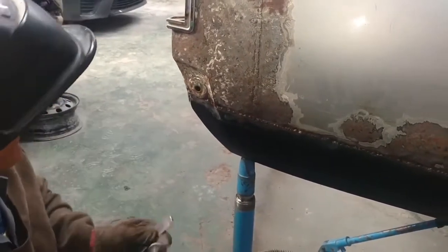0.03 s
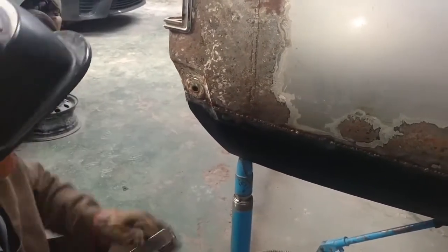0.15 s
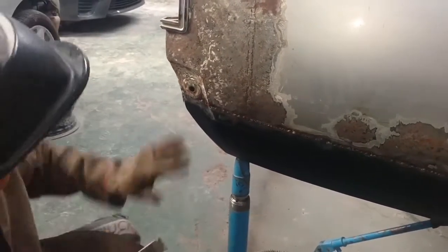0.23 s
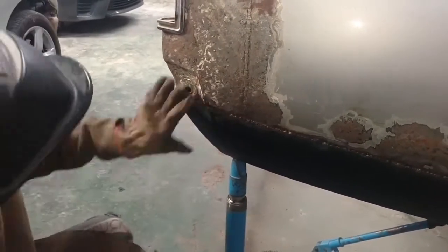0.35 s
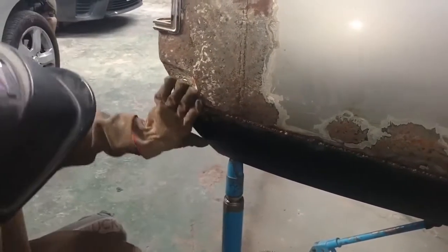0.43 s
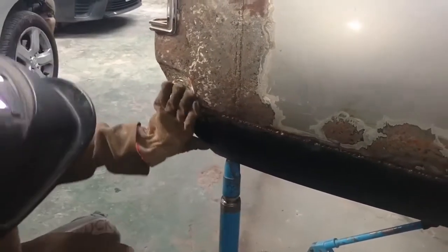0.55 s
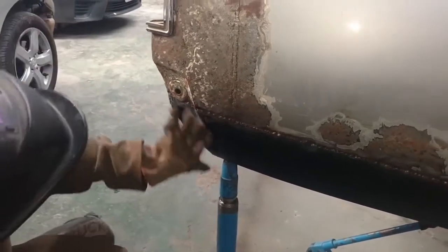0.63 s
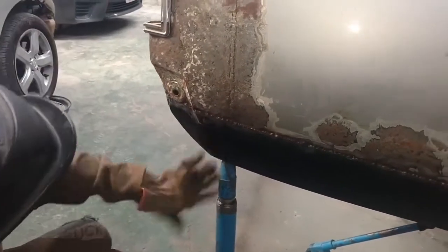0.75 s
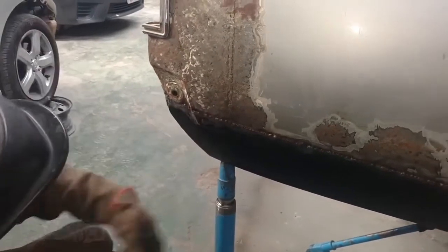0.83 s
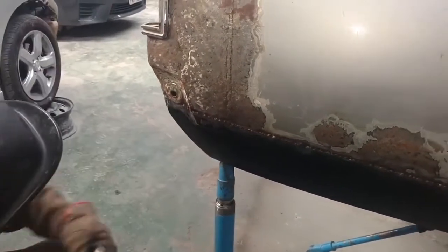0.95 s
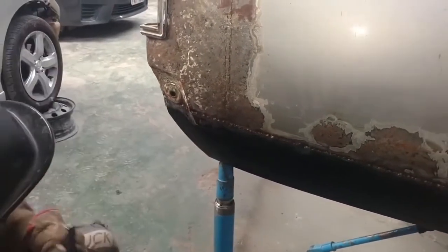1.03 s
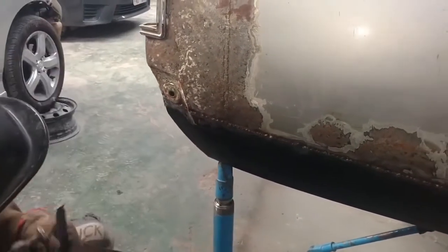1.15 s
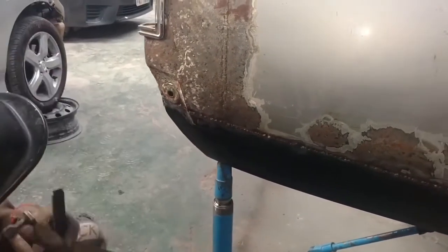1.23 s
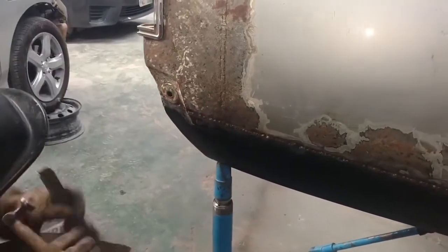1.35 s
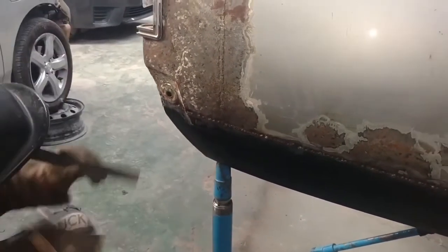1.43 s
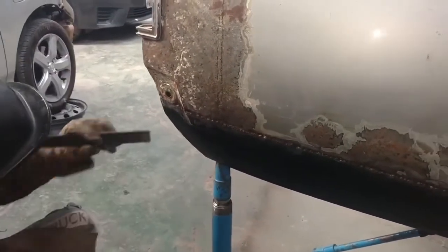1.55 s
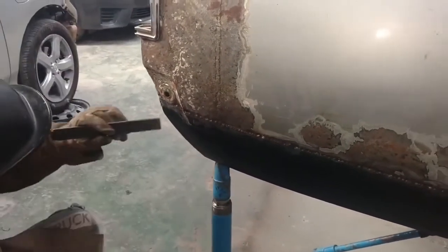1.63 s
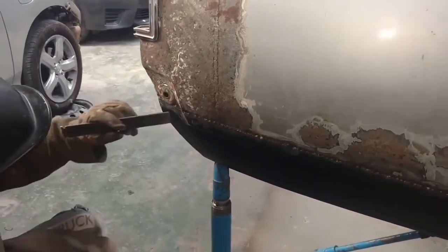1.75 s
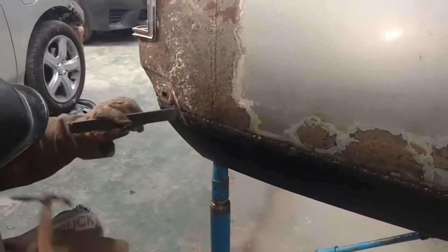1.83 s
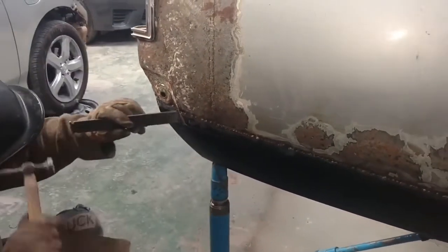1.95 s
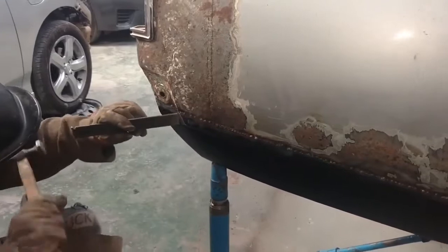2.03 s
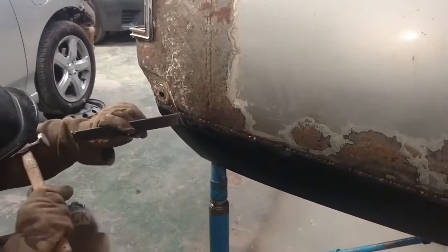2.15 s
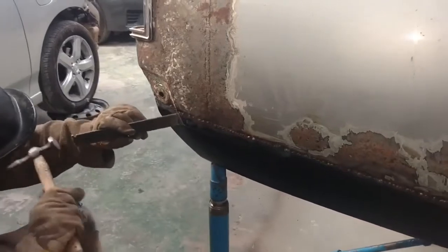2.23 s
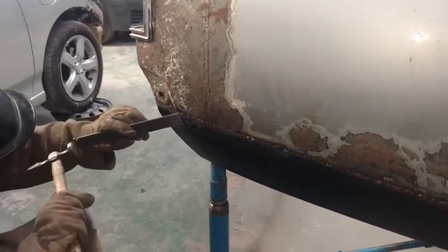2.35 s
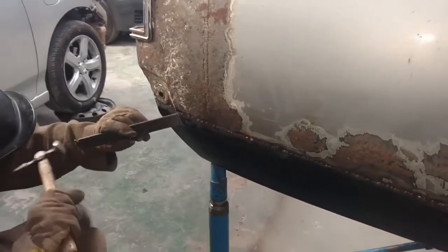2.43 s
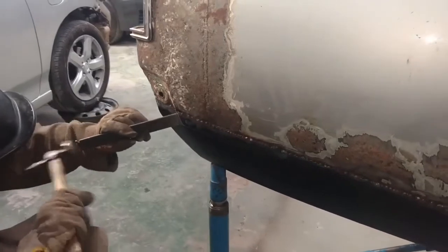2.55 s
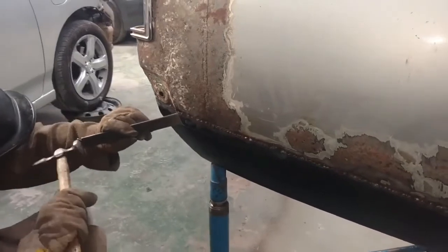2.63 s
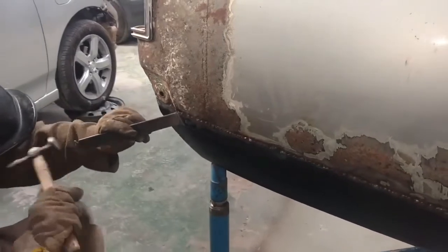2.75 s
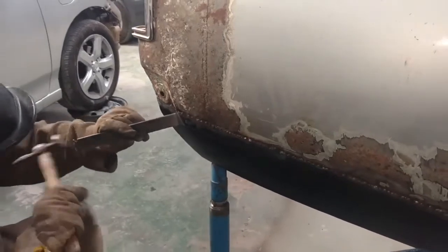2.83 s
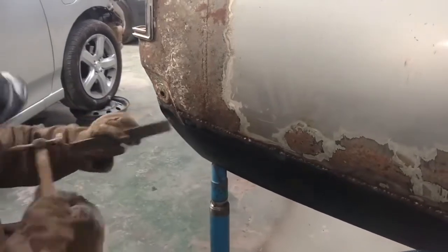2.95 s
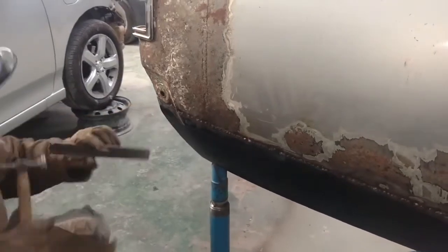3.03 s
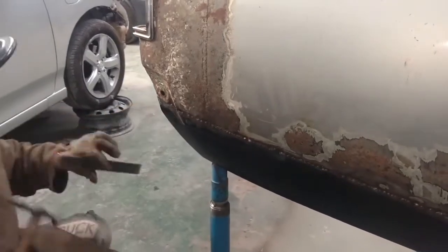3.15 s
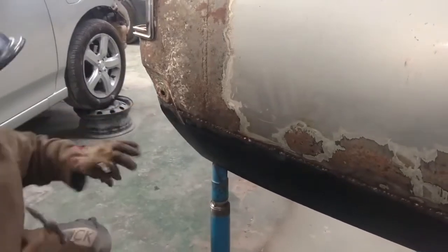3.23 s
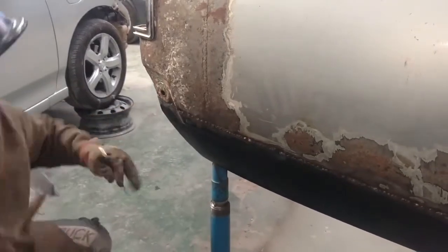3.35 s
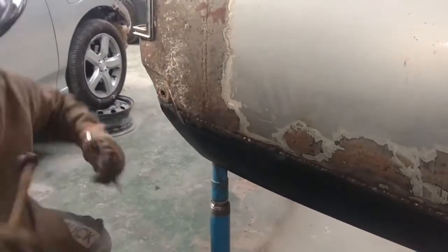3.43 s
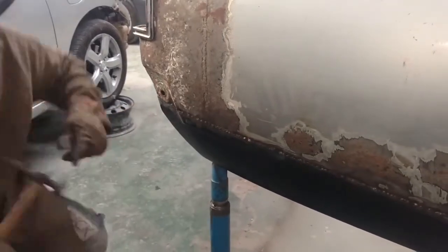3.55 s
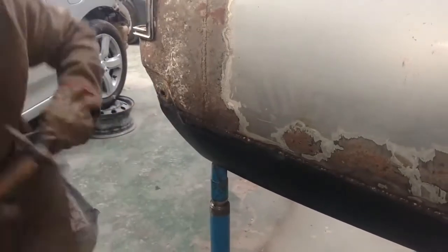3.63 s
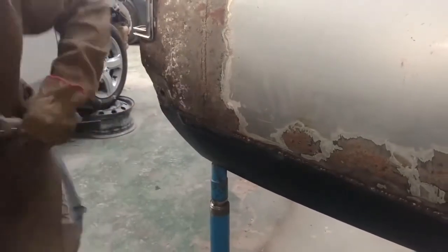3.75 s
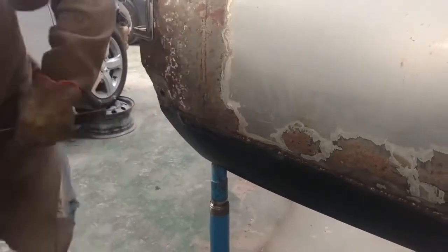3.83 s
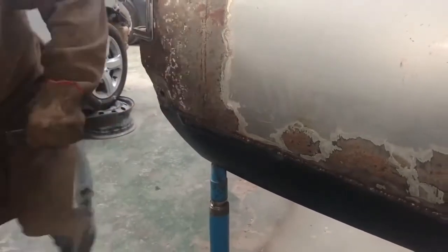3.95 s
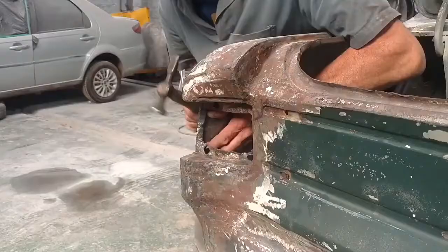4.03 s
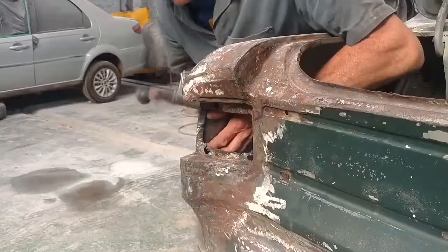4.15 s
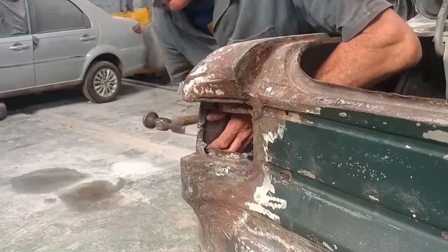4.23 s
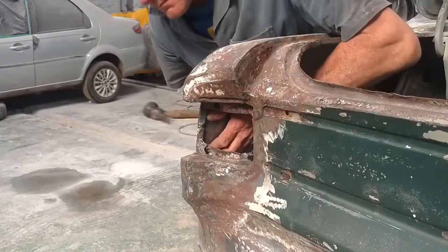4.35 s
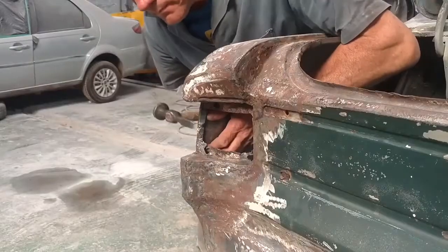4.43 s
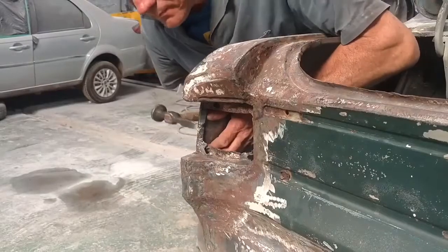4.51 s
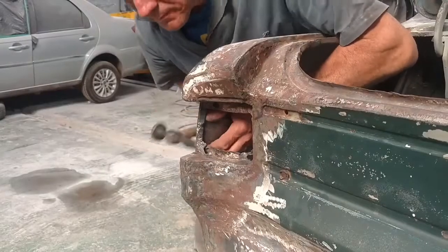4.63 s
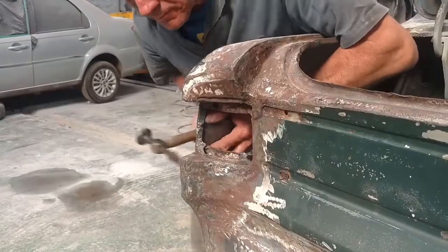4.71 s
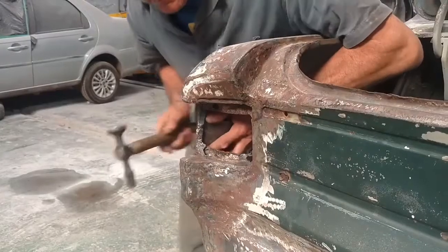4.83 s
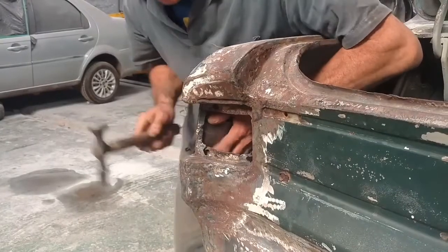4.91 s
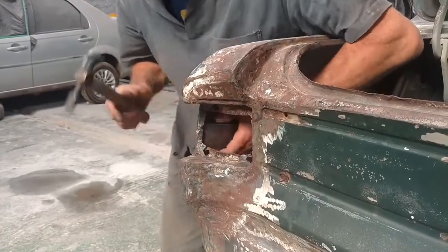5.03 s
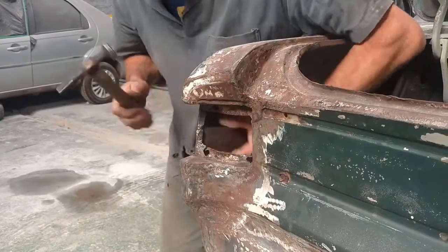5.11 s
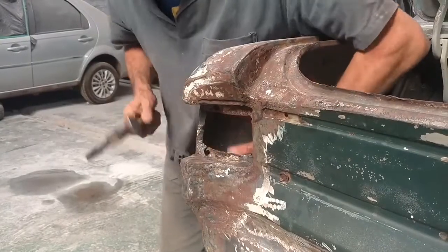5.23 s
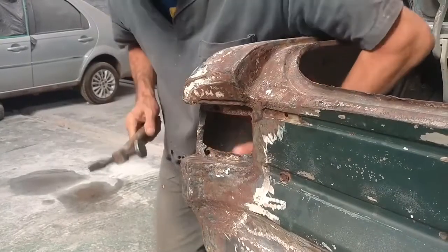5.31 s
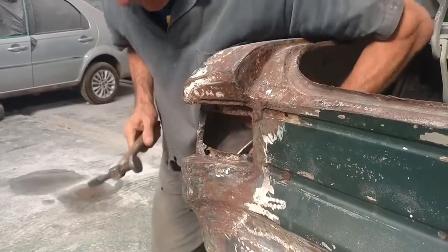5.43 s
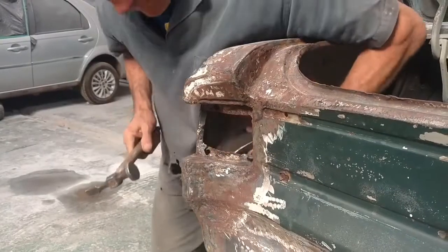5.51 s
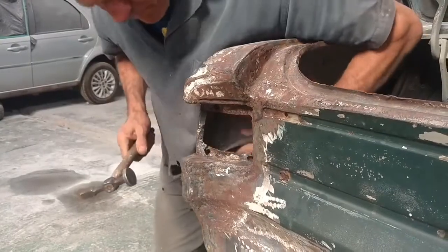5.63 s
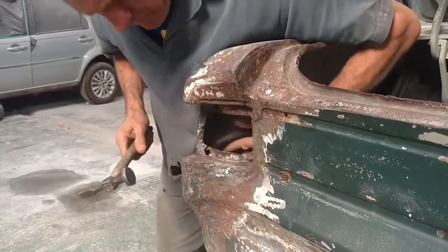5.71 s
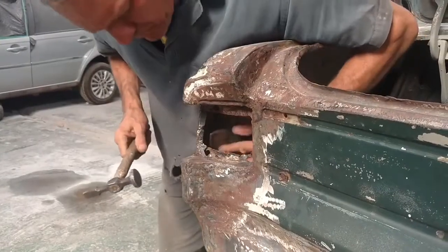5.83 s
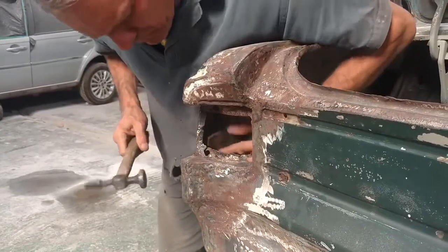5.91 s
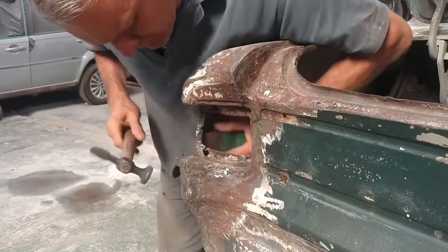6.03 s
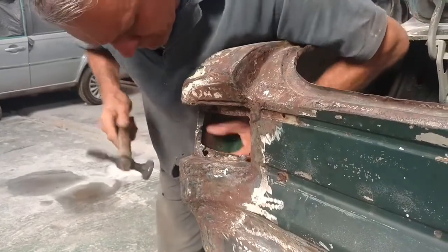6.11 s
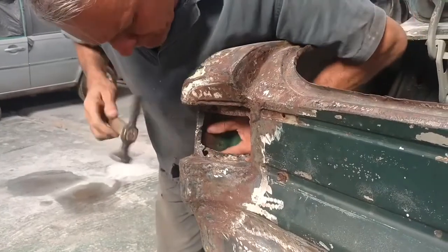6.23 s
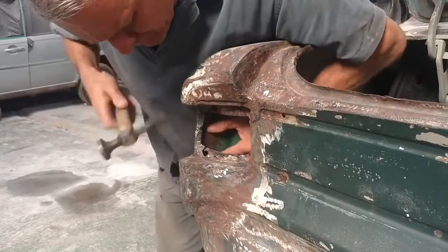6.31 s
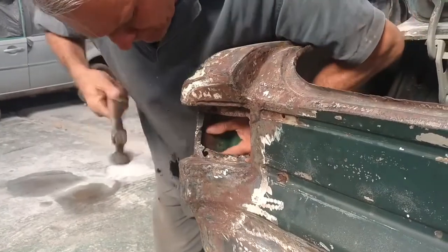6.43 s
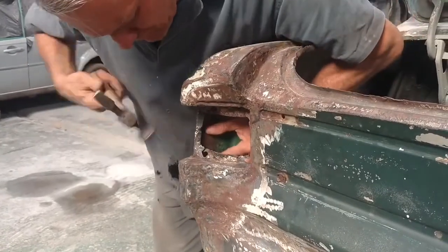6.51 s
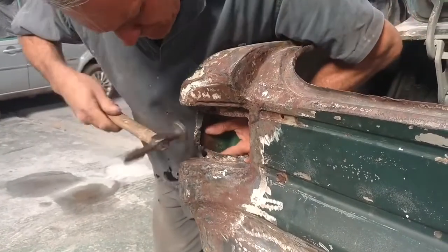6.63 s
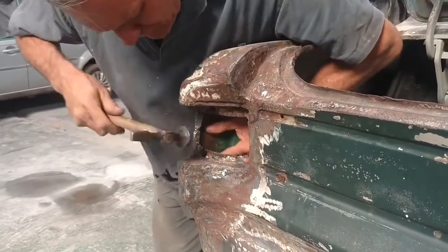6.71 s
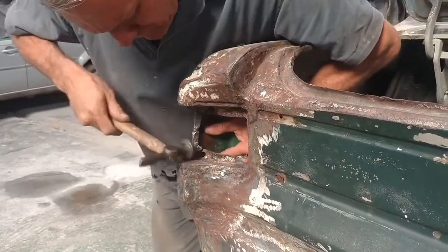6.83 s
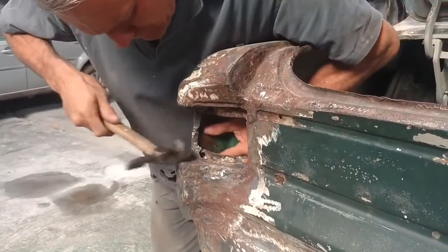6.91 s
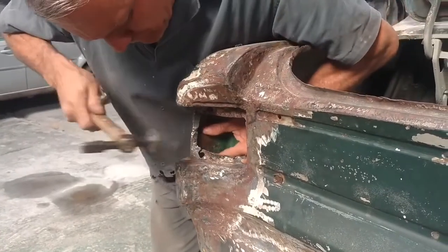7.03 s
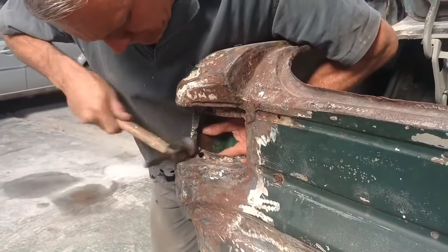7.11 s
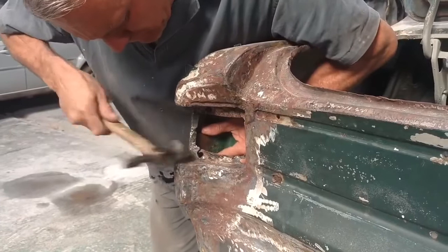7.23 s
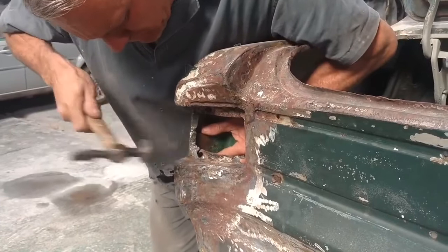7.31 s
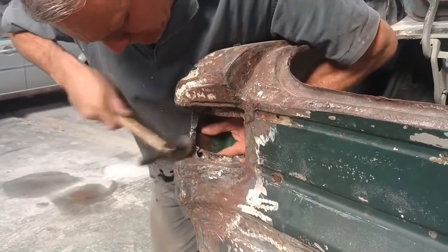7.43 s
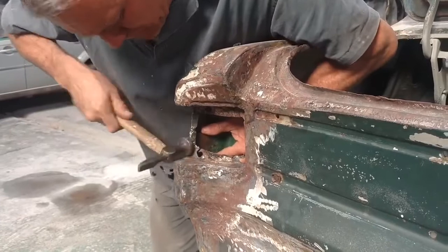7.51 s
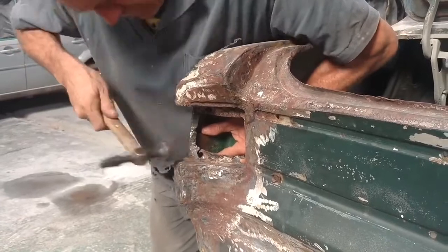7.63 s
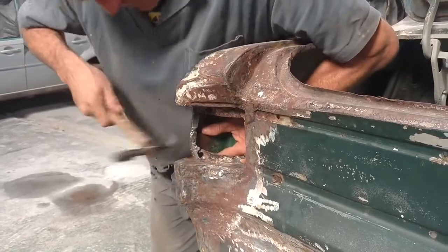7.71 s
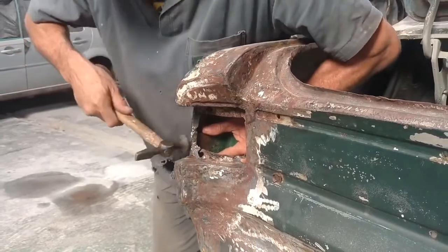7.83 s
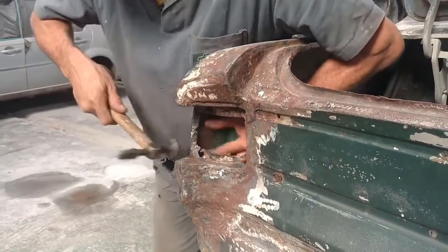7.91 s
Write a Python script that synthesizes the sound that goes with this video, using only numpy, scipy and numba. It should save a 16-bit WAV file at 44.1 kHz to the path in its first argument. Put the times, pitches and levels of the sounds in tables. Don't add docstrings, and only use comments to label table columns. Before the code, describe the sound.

Hammer-driven chisel bangs into a rusty car sill while a van passes; after a gap, a hammer clangs on thinner panel, with a distant horn.

```python
import sys
import numpy as np
from scipy import signal
from scipy.fft import rfft, irfft, next_fast_len
from scipy.io import wavfile
from scipy.ndimage import uniform_filter1d
from numba import njit

SR = 44100
rng = np.random.default_rng(int(sys.argv[2]) if len(sys.argv) > 2 else 0)


def materialize(psi):
    bounded = np.clip(np.atleast_2d(psi).T, -1, 1)
    quanta = np.round(bounded * 32767).astype(np.int16)
    wavfile.write(sys.argv[1], SR, quanta)


def convert_level_to_amplitude(level_db):
    exponent = np.asarray(level_db, float) / 20
    return 10 ** exponent


N = 351477
TIME = np.arange(N) / SR
CENTRES = 70 * 2 ** np.arange(0, 8.1, .5)[:, None]
CUT_S, BACK_S = 4.004, 4.138

# pitch_hz, level_db (per Hz)
RUB_COLOUR = [(500, -2), (2000, -18), (4500, 2.5), (6500, -5), (9000, -14), (13000, -21), (15500, -20)]


def along(table, hz):
    table_hz, values = np.transpose(table)
    return np.interp(np.log(np.maximum(hz, 1)), np.log(table_hz), values)


def unit(x):
    return x / np.sqrt(np.mean(x ** 2))


def noise(colour, size=N):
    padded = next_fast_len(size)
    hz = np.fft.rfftfreq(padded, 1 / SR)
    spectrum = rfft(rng.standard_normal((2, size)), padded)
    return unit(irfft(spectrum * convert_level_to_amplitude(along(colour, hz)))[:, :size])


def band(x, lo_hz, hi_hz):
    return signal.sosfilt(signal.butter(2, [lo_hz, hi_hz], "bandpass", fs=SR, output="sos"), x)


def split(x):
    hz = np.fft.rfftfreq(x.shape[1], 1 / SR)
    octaves_away = np.abs(np.log2(np.maximum(hz, 1) / CENTRES))
    return irfft(rfft(x)[:, None] * np.maximum(1 - 2 * octaves_away, 0), x.shape[1])


def walk(rate):
    k = int(SR / rate)
    steps = np.repeat(rng.standard_normal(N // k + 1), k)
    return unit(uniform_filter1d(uniform_filter1d(steps, k), k)[:N])


def swell(s, hold_s, db, rise_db_s, fall_db_s):
    early_s = np.maximum(s - TIME, 0)
    late_s = np.maximum(TIME - s - hold_s, 0)
    return convert_level_to_amplitude(db - rise_db_s * early_s - fall_db_s * late_s)


def add(track, s, sound):
    i = max(int(s * SR), 0)
    track[:, i:i + sound.shape[1]] += sound[:, :N - i]


@njit
def ring(poles, starts, size):
    out = np.zeros((2, size))
    for m in range(len(poles)):
        z = 1. + 0j
        for i in range(size):
            z *= poles[m]
            out[0, i] += (starts[0, m] * z).imag
            out[1, i] += (starts[1, m] * z).imag
            if z.real ** 2 + z.imag ** 2 < 1e-6:
                break
    return out


def modes(hz, gain, t60):
    decay = np.log(1000) / np.clip(t60, .01, 1.2)
    poles = np.exp((2j * np.pi * hz - decay) / SR)
    starts = gain * np.exp(2j * np.pi * rng.random((2, len(hz))))
    return ring(poles, starts, SR // 2)


def panel(blows, colour, named, named_db, crack_db, level_db, rise_s, ring_share, rattle_s, thump_db):
    # pitch_hz, fade_s
    sheet_fade = [(150, 0.66), (400, 0.47), (1000, 0.31), (2800, 0.15), (7000, 0.11), (15000, 0.068)]
    out, t = np.zeros((2, N)), TIME[:20480]
    named_hz, own_db, own_t60 = np.transpose(named)
    for s, db, treble_db, bass_db, spot_hz in blows:
        def favour(hz):
            return 5.5 * np.exp(-(np.log2(hz / spot_hz) / 0.37) ** 2)

        length = ring_share + 0.043 * bass_db
        top_db = treble_db + 2.5 - 0.29 * bass_db
        tilt = [(250, bass_db), (520, 0.22 * bass_db), (900, 0.0093), (1500, 0.019),
                (5000, treble_db), (13000, top_db)]

        patchy_db = along(tilt, CENTRES) + favour(CENTRES) + .9 * rng.standard_normal(CENTRES.shape)
        fade = 1000 ** (-np.maximum(t - rattle_s, 0) / (length * along(sheet_fade, CENTRES)))
        crack = 1 + convert_level_to_amplitude(crack_db + 2.0 * np.log2(CENTRES / 4000)) * np.exp(-t / 0.002)
        build = 1 - np.exp(-t * CENTRES * 2.2)
        sheet = (split(noise(colour, size=len(t))) * convert_level_to_amplitude(patchy_db) * fade * crack * build).sum(1)

        detune, scatter = rng.standard_normal((2, len(named)))
        strong_db = own_db + along(tilt, named_hz) + 1.4 * favour(named_hz) + 1.5 * scatter
        strong = modes(named_hz * (1 + .01 * detune), convert_level_to_amplitude(strong_db), length * np.minimum(own_t60, .3))
        hit = (sheet + convert_level_to_amplitude(named_db) * strong[:, :len(t)]) * (1 - np.exp(-t / rise_s))
        hit = hit / np.sqrt(np.mean(hit[:, :SR // 30] ** 2))

        thump = np.sin(2 * np.pi * spot_hz * t) * np.exp(-t * spot_hz / 2)
        thump = convert_level_to_amplitude(thump_db + 0.31 * bass_db) * thump
        add(out, s, convert_level_to_amplitude(db + level_db) * (hit + band(thump, 170, 9000)))
    return out


def sill():
    # start_s, level_db, treble_db, bass_db, pitch_hz (of the struck patch)
    blows = [
        (1.9, -12.5, -7.5, 6.5, 540),
        (2.366, -7.5, 2, 2.5, 800),
        (2.603, -6, -2.5, -2.5, 694),
        (2.917, -8.5, 0, 5, 830),
    ]
    bumps = [
        (1.945, -19, -5.5, 3.1, 930),
        (2.04, -29, -13, 3.4, 900),
        (3.16, -40, -4.5, 3, 800),
    ]
    # pitch_hz, level_db (per Hz)
    colour = [(40, -37), (100, -46), (170, -9.5), (350, -0.5), (700, 1.5), (1200, 1), (1800, -3.5),
              (2600, -1.5), (4500, 1), (6500, -11), (9000, -19), (13000, -36.5), (15500, -52)]
    # pitch_hz, level_db, fade_s (by 60 dB)
    strong_modes = [(554, -5, 0.89), (753, -4, 0.19), (800, -4.5, 0.45), (827, -3.5, 1.5),
                    (968, -10.5, 0.28), (1007, -15.5, 0.59), (1260, -25.5, 2.5), (1238, -6.5, 0.15),
                    (1540, 0, 0.21)]
    hard = panel(blows, colour, strong_modes, named_db=-7.0, crack_db=12.0, level_db=-12.0,
                 rise_s=0.00029, ring_share=1.0, rattle_s=0.0068, thump_db=4.5)
    soft = panel(bumps, colour, strong_modes, named_db=-4.5, crack_db=-39, level_db=-12.5,
                 rise_s=0.0035, ring_share=2.5, rattle_s=0.014, thump_db=-18)
    return hard + soft


def wing():
    # start_s, level_db, treble_db, bass_db, pitch_hz (of the
    blows = [
        (4.437, -12.5, 5, 4.5, 1010),
        (4.621, -15.5, 4, 2, 1000),
        (4.652, -19, 0, 4, 670),
        (4.693, -20.5, 2.5, 8, 885),
        (5.4585, -13.5, 1, 7.5, 530),
        (5.973, -27.5, -16, 14, 476),
        (6.045, -19.5, 2.5, 11.5, 648),
        (7.172, -6.5, -2, -5, 1130),
        (7.507, -5.5, -0.5, -3, 1300),
        (7.798, -7.5, -1, -5.5, 1300),
    ]
    bumps = [
        (5.07, -34.5, -7.5, 14.7, 294),
        (5.14, -33, -5, 4.7, 590),
        (5.725, -29, -12, 16.5, 550),
        (6.18, -43, -3, 11, 500),
        (6.385, -44, 5, 3.5, 1240),
        (6.42, -43.5, -8, 3, 1200),
        (7.0, -42, -38, 15, 200),
        (4.634, -19.5, -1, 3, 500),
        (4.668, -21, 1, 3.5, 1220),
    ]
    # pitch_hz, level_db (per Hz)
    colour = [(40, -31), (100, -26), (170, -3.5), (350, -2.5), (700, 2), (1200, -1.5), (1800, -2),
              (2600, -4), (4500, -5), (6500, -10), (9000, -17.5), (13000, -30.5), (15500, -42)]
    # pitch_hz, level_db, fade_s (by 60 dB)
    strong_modes = [(317, -7, 0.51), (518.3, 4.5, 0.12), (807, -3.5, 5.0), (918, -15.5, 0.28),
                    (1028, -0.5, 0.57), (1300, -7, 0.3), (1480, -11, 0.27), (1790, -27.5, 0.2),
                    (1950, -22.5, 0.91), (2100, -34, 0.6), (3840, -22, 0.15), (4300, -58.5, 1.2)]
    hard = panel(blows, colour, strong_modes, named_db=-11.0, crack_db=4.0, level_db=-6.0,
                 rise_s=0.00019, ring_share=1.0, rattle_s=.011, thump_db=1)
    soft = panel(bumps, colour, strong_modes, named_db=-10, crack_db=-18, level_db=-8.0,
                 rise_s=0.0015, ring_share=0.68, rattle_s=0.036, thump_db=-16)
    return hard + soft


def clink(clinks, bar, tick_db):
    out = np.zeros((2, N))
    hz, own_db, t60 = np.transpose(bar)
    tick_fade = np.exp(-TIME[:SR // 2] / 0.0073)
    for s, db, treble_db, length in clinks:
        ring_db = own_db + treble_db * np.log2(hz / 6000) + 1.5 * rng.standard_normal(len(hz))
        rings = modes(hz, convert_level_to_amplitude(ring_db), length * t60)
        tick_colour = [(250, -41), (800, -6.5), (2500, -16.0 - treble_db), (4200, 7.5), (7000, -4),
                       (14000, treble_db - 25.0)]
        tick = noise(tick_colour, size=SR // 2) * tick_fade
        add(out, s, convert_level_to_amplitude(db) * (rings + convert_level_to_amplitude(tick_db) * tick))
    return out


def chisel():
    # start_s, level_db, treble_db (per octave), length (times the bar's fade)
    clinks = [
        (0.001, -52, -15, 1),
        (.02, -57, -10, .3),
        (.098, -42.5, -23, 0.057),
        (.179, -28.5, -0.5, 0.43),
        (.416, -71.5, -7, 0.16),
        (1.025, -37, -14, 0.27),
        (1.04, -45, -16, 0.52),
    ]
    driven = [
        (1.97, -39, -2, 0.55),
        (2.365, -40.5, -4, 1),
        (2.603, -20.5, 1, 0.37),
        (2.916, -17, 5, 0.25),
    ]
    # pitch_hz, level_db, fade_s (by 60 dB)
    loose_bar = [(2374, -17, .1), (3397, -16, .3), (4055, -14, .14), (4950, -12, .35), (5700, -14, .15),
                 (6562, -4, .18), (8506, -6, .22), (10130, -8, .2), (10490, -6, .12), (12550, 0, .18),
                 (14000, -8, .08)]
    held_bar = [(3407, -6.5, 0.67), (3460, -5, .5), (3740, -2.5, 0.24), (4170, -21, 0.12),
                (5060, -3.5, .25), (6550, -2, 0.08), (8320, -5, 0.092), (10790, -12, 0.34),
                (10620, -8, 0.27)]
    return clink(clinks, loose_bar, tick_db=3.5) + clink(driven, held_bar, tick_db=-10)


def van():
    # pitch_hz, level_db (per Hz)
    colour = [(40, -15), (100, -9), (170, -3.5), (350, -2), (700, -0.5), (1200, -11), (1800, -6.5),
              (2600, -21.5), (4500, -29.5), (6500, -43.5), (9000, -53.5), (13000, -60), (15500, -70)]
    # pitch_hz, width_hz, level_db
    hum_bands = [
        (170.4, 23, -4.5),
        (354.4, 27, -5),
        (662.5, 25, -13.5),
    ]
    air = noise(colour)
    white = rng.standard_normal((2, N))
    nearest_s = 2.32
    near = swell(nearest_s, hold_s=0, db=0, rise_db_s=10.5, fall_db_s=22)
    load = swell(nearest_s, hold_s=0.0067, db=0, rise_db_s=9, fall_db_s=176)
    idle = convert_level_to_amplitude(-18) * near ** 4.1

    hums = sum(convert_level_to_amplitude(db) * unit(band(white, hz - width / 2, hz + width / 2)) for hz, width, db in hum_bands)
    rumble = unit(band(air, 69, 430)) * 0.86
    engine = (rumble + hums) * convert_level_to_amplitude(-37.5 + 2.3 * walk(17)) * (load + idle)

    tyres = unit(band(air, 893, 2700)) * convert_level_to_amplitude(-39 + 0.57 * walk(19)) * (near + convert_level_to_amplitude(-28.5))

    hiss = unit(band(air, 3900, 15000)) + 0.13 * unit(band(white, 3950, 4350))
    slip = swell(1.5, hold_s=0.01, db=-47.5, rise_db_s=41.5, fall_db_s=27)
    belt = hiss * convert_level_to_amplitude(1.5 * walk(14)) * (convert_level_to_amplitude(-45) * near ** 0.76 + slip)
    return engine + tyres + belt


def horn():
    # multiple (of the base pitch), level_db
    partials = [(1, -7.5), (2, 0.5), (3, -0.5), (4, 1.5), (5, -9), (6, -6.5), (7, -40)]
    # start_s, hold_s, level_db, rise_db_s, fall_db_s
    hoots = [
        (6.36, 0.034, -49, 88.6, 46.3),
        (6.6, 0.58, -64, 90, 304),
    ]
    turn = 2 * np.pi * 231.5 * TIME
    tone = np.zeros((2, N))
    for multiple, db in partials:
        phase = multiple * turn + 0.96 * walk(24) + 2 * np.pi * rng.random((2, 1))
        tone += convert_level_to_amplitude(db + 3.2 * walk(12)) * np.sin(phase)
    return tone * sum(swell(*hoot) for hoot in hoots)


def rubs():
    # start_s, hold_s, level_db, edge_db_s (rise and fall), hiss_db (fine treble)
    strokes = [
        (0.39, 0.076, -63.5, 303, -3),
        (0.642, 0.13, -55, 188, -3),
        (1.19, 0.032, -53, 200, -15),
        (3.76, .12, -49.5, 341, -15),
        (6.525, 0.28, -72.5, 300, 18),
        (7.014, 0.19, -69, 118, 17),
    ]
    drag = noise(RUB_COLOUR) * convert_level_to_amplitude(2.0 * walk(110))
    fine = band(drag, 8200, 15500)
    return sum(swell(s, hold_s, db, edge, edge) * (drag + convert_level_to_amplitude(hiss_db) * fine)
               for s, hold_s, db, edge, hiss_db in strokes)


def air_line():
    return noise(RUB_COLOUR) * swell(3.5, hold_s=0.5, db=-63, rise_db_s=0, fall_db_s=3.5)


def hall_air():
    # pitch_hz, level_db (per Hz)
    colour = [(40, -34), (100, -6), (170, 1), (350, -3.5), (700, -6.5), (1200, -7), (1800, -14.5),
              (2600, -17), (4500, -19.5), (6500, -27.5), (9000, -34), (13000, -46), (15500, -28)]
    steady = convert_level_to_amplitude(np.where(TIME < BACK_S, -57, -53))
    van_echo = swell(1.5, hold_s=-0.84, db=-49.5, rise_db_s=41, fall_db_s=7.5)
    return noise(colour) * convert_level_to_amplitude(0.37 * walk(9.8)) * (steady + van_echo)


def hall(x, wet_db):
    # pitch_hz, fade_s
    echo_fade = [(150, 0.98), (1000, 2.2), (4000, 1.24), (10000, 0.54)]
    t = TIME[:65536]
    t60 = along(echo_fade, CENTRES)
    slices = split(rng.standard_normal((2, len(t))))
    tail = (slices * 1000 ** (-t / t60) / t60 ** 0.13).sum(1) * (1 - np.exp(-t / 0.0012))
    tail = tail / np.sqrt((tail ** 2).sum(1, keepdims=True))
    return x + convert_level_to_amplitude(wet_db) * signal.fftconvolve(x, tail, axes=1)[:, :N]


def scene():
    first = hall(sill() + chisel(), wet_db=-17) + van()
    second = hall(wing(), wet_db=-16) + horn() + air_line()
    background = hall_air() + rubs()
    ends = TIME < CUT_S
    settle = 1 - .75 * np.exp(-np.maximum(TIME - BACK_S, 0) / .03)
    begins = swell(BACK_S, hold_s=9, db=0, rise_db_s=1700, fall_db_s=0) * settle
    return (first + background) * ends + (second + background) * begins


def low_pass(x):
    return signal.sosfilt(signal.butter(12, 16530, fs=SR, output="sos"), x)


def record(dry):
    # pitch_hz, level_db
    wide = [(60, -1.5), (150, -6), (400, -6.5), (800, -9), (1300, -17), (3000, -13), (15000, -20)]
    # pitch_hz, share
    pull = [(60, .2), (200, 0.28), (700, .15), (1300, 0.015), (3000, 0.095), (4500, 0.085), (7000, 0.032)]
    size = next_fast_len(N)
    hz = np.fft.rfftfreq(size, 1 / SR)
    near, other = rfft(np.tanh(1.54 * dry) / 2.075, size) / (1 + (hz / 16530) ** 40)
    turn = np.pi * np.maximum(hz - 1300, 0) / 2600
    tied = .5
    mid = near * np.cos(turn) + 1j * 0.25 * other * np.sin(turn)
    swapped = -1j * tied * near + np.sqrt(1 - tied ** 2) * other
    side = np.sin(turn) * swapped + convert_level_to_amplitude(along(wide, hz)) * np.cos(turn) * other
    lean = irfft(along(pull, hz) * mid, size)[:N]
    mid, side = irfft(mid, size)[:N], irfft(side, size)[:N]
    side -= lean * np.where(TIME > CUT_S, 1.3, .45)
    return low_pass(np.array([mid + side, mid - side]))


dry = scene()
out = record(dry)
materialize(out)
```